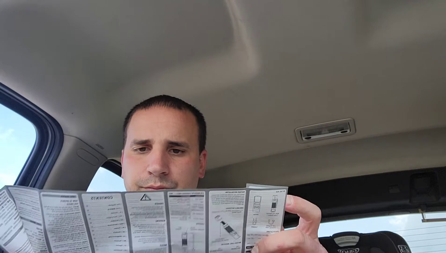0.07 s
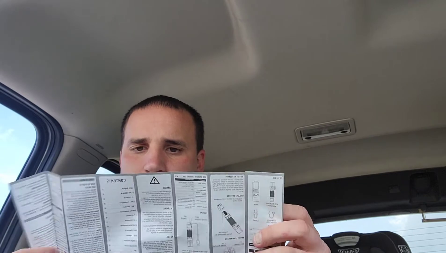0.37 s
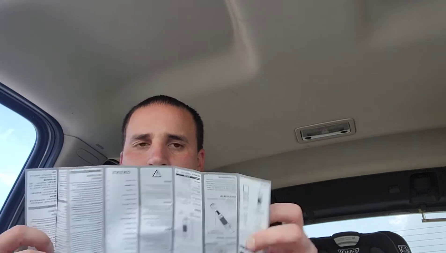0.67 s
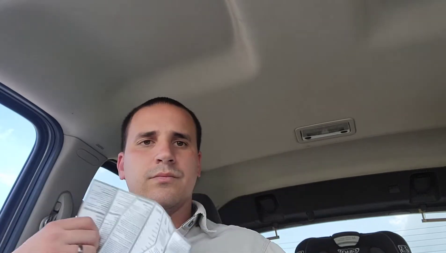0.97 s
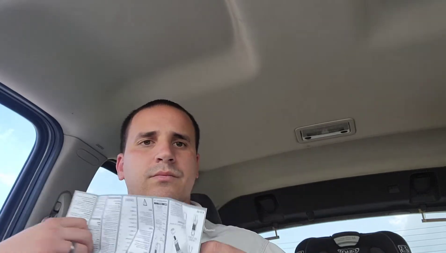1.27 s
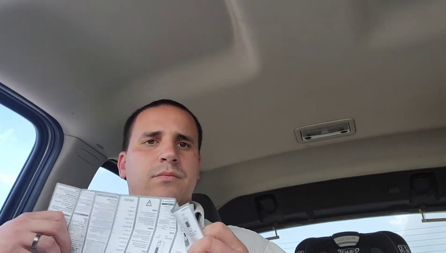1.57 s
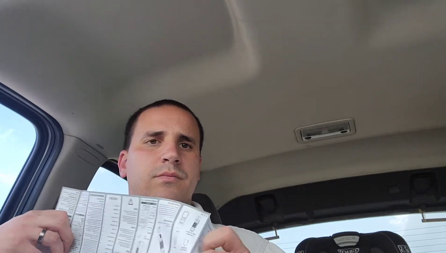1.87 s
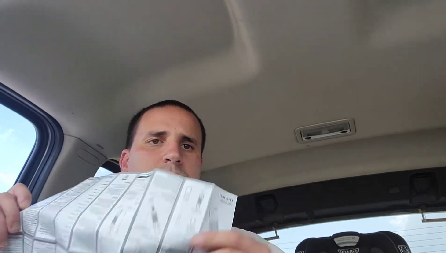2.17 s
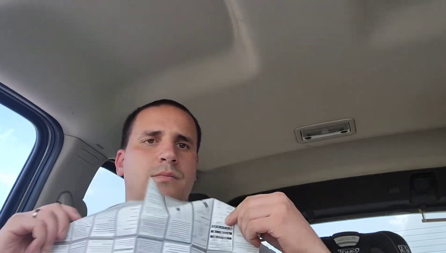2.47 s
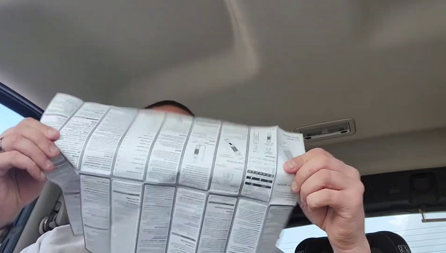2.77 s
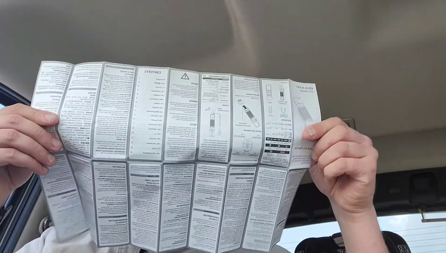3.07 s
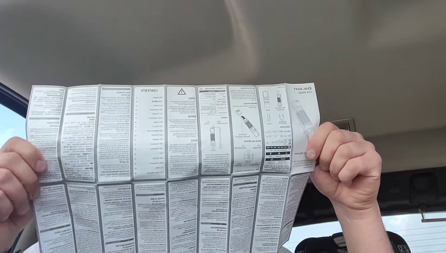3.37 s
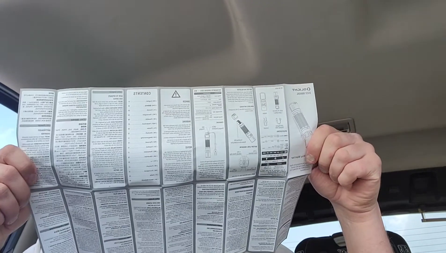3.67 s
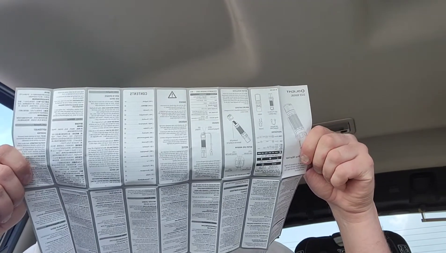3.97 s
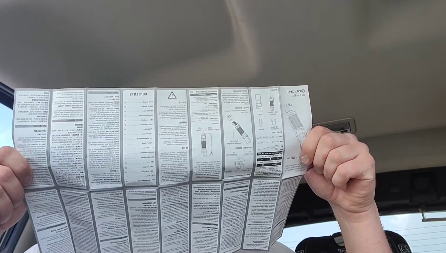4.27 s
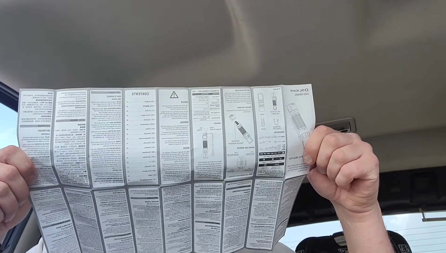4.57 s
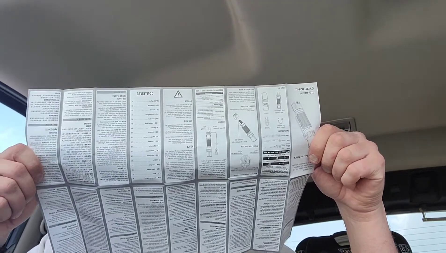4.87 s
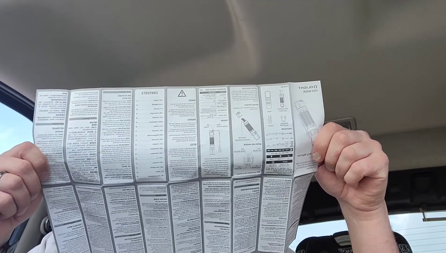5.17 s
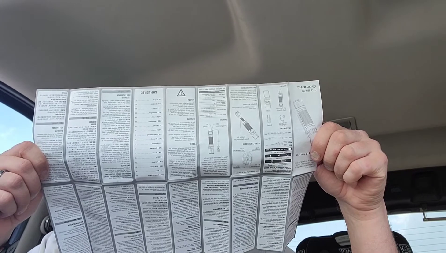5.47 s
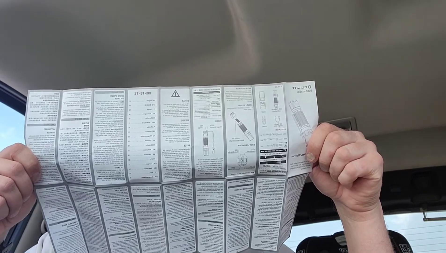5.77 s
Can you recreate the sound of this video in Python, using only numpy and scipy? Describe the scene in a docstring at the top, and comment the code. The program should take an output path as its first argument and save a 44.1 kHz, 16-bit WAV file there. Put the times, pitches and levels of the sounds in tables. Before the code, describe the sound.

A steady low hum and rumble from an idling engine fills a vehicle cabin for all six seconds. Close to the microphone, a folded paper leaflet is opened. It begins with light crackles and faint fingertip rubbing in the first half second. From about 0.8 to 2.3 seconds the creases snap in quick, irregular clusters over the rustle of sliding panels, with a sharp snap near 2 seconds. At about 2.7 seconds the sheet flaps open with the loudest crackle and a short, soft thud. Lighter ticks follow and die away by about 3.8 seconds as the paper is held still. The snaps sound tight and close in the small space. From around 4 seconds a faint drone climbs slowly in pitch over the hum, and a barely audible thin whine enters near 4.5 seconds. The hum carries on to the end.

```python
"""Paper snaps and rustles: a folded leaflet is opened near a phone in the cabin of an idling vehicle.
Creases buckle in short runs, panels slide, fingertips rub, the sheet flaps open once.
Glass and trim reflect the paper at short delay. Then the sheet is held still over the engine hum;
a faint drone rises in pitch and a thin whine comes in."""
import sys
import numpy as np
from scipy import signal
from scipy.fft import rfft, irfft
from scipy.io import wavfile
from scipy.ndimage import uniform_filter1d

SR = 44100
rng = np.random.default_rng(int(sys.argv[2]) if len(sys.argv) > 2 else 0)


def wav_record(signal):
    """Record a signal, one row per channel, as 16-bit PCM in the file named by sys.argv[1]."""
    frames = np.transpose(np.atleast_2d(signal))
    bounded = np.clip(frames, -1, 1)
    # unit amplitude maps onto the largest positive 16-bit level
    quanta = np.round(bounded * 32767).astype(np.int16)
    wavfile.write(sys.argv[1], SR, quanta)


N = 264688
TIME_S = np.arange(N) / SR

# buckling creases: (time [s], run length [ms], relative level [dB], bass [dB], treble [dB],
# panel ring [Hz], ring boost [dB])
CREASE_SNAPS = [(0.083, 18.2, -34.5, -1, -11, 1810, -2), (0.198, 2.03, -36.5, -14, 3.5, 4300, 4.5),
                (0.28, 3.06, -44, 12, -45, 2830, 10), (0.353, 4.5, -35.5, -0.5, -5, 5030, 7.5),
                (0.42, 3.4, -39.5, -4, -11, 1700, 4), (0.445, 2.28, -29.5, -10.5, -5, 2040, -0.5),
                (0.826, 4.7, -43, 17.5, -26, 2970, 10), (0.85, 5.8, -32.5, 1, -3, 3620, 7),
                (0.874, 9, -35, -8, -1, 2340, 7), (1.0234, 4.2, -28.5, -12, 6, 1800, 10.5),
                (1.078, 8, -33.5, 0, -40, 1980, 16.5), (1.113, 5.1, -46.5, 15.5, -30, 1443, 7),
                (1.155, 11.5, -37, 2, -2.5, 1920, 3.5), (1.2323, 2.93, -26, 0.5, 2, 4600, 11.5),
                (1.2778, 4.03, -29.5, 0, -.5, 4830, 0), (1.343, 5.7, -31, -2.5, -2, 4800, 5),
                (1.399, 8.3, -28.5, -6, 2, 1630, 17), (1.407, 2.2, -27.5, 0, 4.5, 3100, -9),
                (1.419, 9, -26, 0, -4, 5530, 3), (1.472, 6, -43, 6, -38, 2500, 9),
                (1.668, 3.8, -32, 8, -5, 2000, 6), (1.6793, 5, -23.5, 2, 6, 2050, 12.5),
                (1.73, 3.5, -34.5, -14, -5, 3300, -1), (1.759, 9.2, -39, 8, -2, 1890, 8),
                (1.826, 3.7, -36.5, 1, -20, 1770, 15), (1.938, 5.5, -35, 1.5, -4, 2400, 6),
                (1.963, 8.8, -40, 5, -18.5, 3373, 5.5), (2.0062, 2.95, -24, -4.5, 5, 1900, 8),
                (2.0438, 1.84, -20, 1, 9.5, 3700, 3), (2.0482, 5.6, -18.5, -2, -1, 3800, 5),
                (2.083, 5.6, -37, 10.5, -19, 1280, 5), (2.135, 4, -40.5, 6.5, -45, 1300, 11.5),
                (2.248, 7.6, -33.5, -3.5, -11, 5150, 2), (2.277, 6.3, -31, 1.5, -15, 3100, 5),
                (2.2914, 5.2, -22, -5.5, 5, 3170, 2), (2.3257, 2.5, -34, -4, -14, 3030, 4.5),
                (2.5309, 2.3, -30.5, -9, -1.5, 3850, 1), (2.578, 12.8, -37.5, 8, -13, 3700, 3),
                (2.623, 19, -29, 7, -8, 2600, .5), (2.645, 12.7, -26, 5, -7, 2640, 6.5),
                (2.6567, 2.28, -18.5, 3, 1, 3477, 3.5), (2.661, 4.74, -13.5, -8.5, 3, 3564, 1),
                (2.672, 14.5, -23, -1.5, -7, 3305, 4), (2.686, 6.7, -26, 2.5, -2.5, 1510, 6),
                (2.7557, 4, -34, 7.5, -8, 3830, 3.5), (2.782, 5.4, -35, 9.5, -19, 1510, 5),
                (2.793, 8, -33, 5, -5.5, 1280, 9), (2.839, 6.3, -45, 11, -17, 2720, 5),
                (3.115, 3.2, -40.5, -4, -34, 3570, 10), (3.1844, 4.2, -36.5, -1, 0, 2300, 8),
                (3.2386, 4.9, -40.5, 14, -47, 1500, 3), (3.431, 4.9, -61.5, 23.5, -37, 805, 10.5),
                (3.5091, 1.9, -33.5, 0, -2, 4300, 8), (3.673, 2.02, -56.5, 15, -10, 2210, 8.5),
                (3.744, 2.3, -57.5, 1, -4, 1900, 3), (4.232, 2, -63.5, 4.5, -3.5, 2000, 3),
                (5.065, 2, -68, 6, 1, 1300, 1.5)]
# radiation spectrum of the sheet: (frequency [Hz], gain [dB])
PAPER_SPECTRUM = [(130, -27.5), (220, -12), (310, -3), (440, -7), (580, 2), (820, -5.5), (1300, -5),
                  (2100, 0), (2700, 0.5), (3600, 0), (6800, -2), (10000, -11.5), (12300, -4.5),
                  (15200, -11)]
# panel sliding on panel: (start [s], length [s], relative level [dB], bass [dB], treble [dB])
PANEL_SLIDES = [(0.076, 0.059, -45.5, -7, 0.5), (0.227, 0.012, -45.5, -4, 0), (0.386, 0.16, -54.5, 2, -5),
                (0.628, 0.012, -57, -1, 10), (0.73, 0.17, -53.5, 12, -5.5), (0.854, .17, -40, 5, -4),
                (0.94, 0.024, -43.5, 8, 7), (1.044, 0.12, -46, 5, -2), (1.18, 0.25, -55, 10, 0),
                (1.376, 0.063, -42, 9.5, -8), (1.49, 0.037, -55.5, 8, 4.5), (1.588, 0.016, -42, 5.5, 0.5),
                (1.642, 0.14, -56, 18.5, 2), (1.83, .14, -47, 7, -2.5), (2.051, .04, -51, 14, -2),
                (2.161, 0.029, -48, 9, -0.5), (2.236, 0.057, -50, 10, -1), (2.447, .045, -57, 16.5, 0.5),
                (2.527, 0.073, -50.5, 8.5, 1.5), (2.679, 0.023, -35.5, 5, -19), (2.735, .075, -51, 13, -1),
                (3.046, 0.4, -64, 11, -0.5), (3.19, 0.04, -57.5, 1, 2)]
# air pushed by the opening sheet: (time [s], frequency [Hz], relative level [dB], decay [s])
FLAP_PARTIALS = [(2.658, 172, -31, 0.021), (2.656, 320, -19.5, 0.0076), (2.657, 390, -24.5, 0.011)]
# fingertips along the edge: (start [s], length [s], relative level [dB])
FINGER_RUBS = [(0.012, 0.17, -59.5), (0.38, 0.26, -62.5)]
# engine and belt drive tones: (frequency [Hz], level [dB])
ENGINE_TONES = [(122.2, -58.5), (293, -62.5), (341, -79.5), (366, -83), (390, -74.5), (439, -78.5)]
# rising drone: (time [s], pitch [Hz], level [dB])
DRONE_TRACK = [(3.7, 225.7, -75), (4.1, 242.3, -61), (4.35, 262, -61), (4.65, 275.8, -53.5),
               (5.0, 288.8, -60.5), (5.4, 296.3, -64.5), (6.0, 303.6, -60.5)]
# late whine: (frequency [Hz], level [dB])
WHINE_PARTIALS = [(1308, -85.5), (1976, -85.5), (2234, -97), (3268, -88), (3924, -93), (4554, -100)]
# treble whistles: (frequency [Hz], level [dB])
WHISTLE_TONES = [(6650, -93), (10000, -91.5), (13300, -93.5)]
# cabin rumble and hiss: (frequency [Hz], gain [dB])
CABIN_SPECTRUM = [(20, -23), (35, -14), (65, 4), (110, -4), (145, -15.5), (300, -16.5), (470, -27),
                  (700, -35), (2000, -44), (5200, -55.5), (7800, -54), (10400, -73), (12800, -59),
                  (15500, -64.5)]
# standing waves between glass and trim: (frequency [Hz], width [Hz], boost [dB])
STANDING_WAVES = [(1140, 71, 6), (1340, 89.6, 0), (1460, 27, 2), (1960, 130, 5), (2300, 147.3, 5),
                  (3428, 240, 3), (3882, 200, 4), (4590, 480, 1.5)]


def snaps(gain_db=26.0, strong_db=-24.5):
    """All creases buckling: dull ones on the sheet's loose left side, strong ones further right."""
    out = np.zeros((2, N + SR))
    for time_s, run_ms, db, bass_db, treble_db, ring_hz, ring_db in CREASE_SNAPS:
        sound, lead = buckle(run_ms, bass_db, treble_db, ring_hz, ring_db)
        left_db = 1.8 - 0.0449 * treble_db - 0.35 * max(db - strong_db, 0)
        start = int(time_s * SR) - lead
        out[:, start:start + sound.shape[1]] += sound * undb(gain_db + db) * pan(left_db)
    return out[:, :N]


def buckle(run_ms, bass_db, treble_db, ring_hz, ring_db, ring_oct=0.3, strain_db=-14, strain_s=0.0043):
    """One crease yields: fibres slip under rising strain, a snap sets off more, the panel rings."""
    size, lead, followers = 8192, 512, 6
    f = bins_hz(size)
    delays_s = np.r_[0, rng.uniform(0, run_ms / 1000, followers)] + lead / SR
    strengths = np.r_[1, 0.55 * rng.laplace(size=followers) / np.sqrt(2)]
    slips = rng.standard_normal(lead) * np.exp((np.arange(lead) - lead) / SR / strain_s)
    strain = undb(strain_db) * np.linalg.norm(strengths) * slips / np.linalg.norm(slips)
    run = strengths @ np.exp(-2j * np.pi * np.outer(delays_s, f)) + rfft(strain, size)
    panel_db = ring_db * np.exp(-(np.log2((f + 1) / ring_hz) / ring_oct) ** 2)
    gain = gain_at(PAPER_SPECTRUM, f) * cabin_gain(f) * undb(panel_db + tilt_db(f, bass_db, treble_db))
    spectrum = rfft(cabin_paths()) * run * minimum_phase(gain)
    midband = (f > 1500) & (f < 6500)
    midband_rms = np.sqrt(np.mean(abs(spectrum) ** 2 * midband, axis=1, keepdims=True))
    return irfft(spectrum / midband_rms), lead


def rustle(rub_db=-9, patchy_db=3.5, taut_s=3.85, fade_s=0.055):
    """Fibre slips over a rubbing hiss; dies away once the sheet is taut."""
    level_db, bass_db, treble_db = handling()
    friction = fibre_slips() + undb(rub_db) * rng.standard_normal((2, N))
    f, t, frames = signal.stft(unit(colour(friction, PAPER_SPECTRUM)), SR, nperseg=512)
    tone_db = tilt_db(f, np.interp(t, TIME_S, bass_db), np.interp(t, TIME_S, treble_db))
    # panel resonances shift as the sheet bends
    patches = uniform_filter1d(rng.standard_normal(tone_db.shape), size=3, axis=0)
    patches = unit(uniform_filter1d(patches, size=8, axis=1))
    frames = frames * cabin_gain(f)[:, None] * undb(tone_db + patchy_db * patches)
    sound = signal.istft(frames, SR)[1][:, :N]
    fade = np.exp(-np.maximum(TIME_S - taut_s, 0) / fade_s)
    return sound * fade * undb(level_db) * pan(left_db=2)


def handling(stir_db=-60, stir_bass_db=7, stir_treble_db=0.5, settle_at_s=1.9, settle_db_per_s=8):
    """Jerky slides over the hands' waning stir of the sheet: (level [dB], bass [dB], treble [dB])."""
    power = undb(stir_db - settle_db_per_s * np.maximum(TIME_S - settle_at_s, 0)) ** 2
    bass, treble = power * stir_bass_db, power * stir_treble_db
    for start_s, length_s, level_db, bass_db, treble_db in PANEL_SLIDES:
        slide = (undb(level_db) * stroke(start_s, length_s)) ** 2
        power += slide
        bass += slide * bass_db
        treble += slide * treble_db
    jerk_db = 1.5 * walk(70)
    return 10 * np.log10(power) + jerk_db, bass / power, treble / power


def fibre_slips(rate_hz=600, spread_db=3.0, spots=4):
    """Dense tiny clicks from several spots on the sheet, each wavering in level."""
    out = 0
    for _ in range(spots):
        strengths = rng.choice([-1, 1], N) * undb(spread_db * np.minimum(rng.exponential(size=N), 5))
        clicks = (rng.random(N) < rate_hz / spots / SR) * strengths * undb(2.5 * walk(14))
        out = out + signal.oaconvolve(clicks[None], cabin_paths(), axes=1)[:, :N]
    return unit(out)


def tilt_db(f, bass_db, treble_db):
    """Wide panels add body below 2.3 kHz; tight creases add treble."""
    body = np.interp(f, [250, 550, 900, 1300, 2300], [.3, .88, .88, .62, 0])
    top = np.interp(f, [3800, 10000], [0, 1])
    return np.multiply.outer(body, bass_db) + np.multiply.outer(top, treble_db)


def flap(rise_s=0.0073):
    """The whole sheet flaps open and pushes air: a short, soft thud."""
    out = np.zeros(N)
    for time_s, hz, db, decay_s in FLAP_PARTIALS:
        age_s = np.maximum(TIME_S - time_s, 0)
        envelope = np.exp(-age_s / decay_s) * (1 - np.exp(-age_s / rise_s))
        out += undb(db) * envelope * np.sin(2 * np.pi * hz * age_s)
    return out


def fingers(rough_db=6.0):
    """Dry skin on paper: narrow, uneven hiss."""
    band = [(2000, -36), (3600, 0), (4350, 5), (5100, -23), (8000, -39)]
    hiss = unit(colour(rng.standard_normal((2, N)), band))
    rubs = sum(undb(db) * stroke(start_s, length_s) for start_s, length_s, db in FINGER_RUBS)
    return hiss * undb(rough_db * walk(60)) * rubs


def stroke(start_s, length_s, attack_s=0.014, release_s=0.031):
    """Envelope of one hand movement: build, hold, decay."""
    before_s = np.maximum(start_s - TIME_S, 0)
    after_s = np.maximum(TIME_S - start_s - length_s, 0)
    return np.exp(-before_s / attack_s - after_s / release_s)


def cabin_paths(crack_s=0.0006, early_s=0.0079, late_s=0.017, direct_db=-4, late_db=-13, size=8192):
    """Sheet to both microphone ports: direct crack, dense near reflections, short dull tail."""
    t = np.arange(size) / SR
    crack = rng.standard_normal(size) * np.exp(-t / crack_s)
    direct = np.array([np.roll(crack, lag) for lag in rng.integers(0, 16, 2)])
    reflections = rng.standard_normal((2, size)) * rng.exponential(size=(2, size))
    early = reflections * np.exp(-t / early_s) * (1 - np.exp(-t / .00035))
    dull_noise = signal.lfilter(*signal.butter(1, 4500, fs=SR), rng.standard_normal((2, size)))
    late = dull_noise * np.exp(-t / late_s)
    return undb(direct_db) * unit(direct) + unit(early) + undb(late_db) * unit(late)


def cabin_gain(f):
    """Resonant peaks of the cabin's standing waves."""
    peaks_db = sum(db / (1 + (2 * (f - hz) / width_hz) ** 2) for hz, width_hz, db in STANDING_WAVES)
    return undb(peaks_db - 0.5)


def close_ports(x):
    """Long waves reach both microphone ports alike: stereo narrows in the bass."""
    mid = colour((x[0] + x[1]) / 2, [(250, 2.0), (500, 1.2), (900, 0.42)])
    side = colour((x[0] - x[1]) / 2, [(250, -9.5), (500, -5.5), (900, 1.0)])
    return np.array([mid + side, mid - side])


def engine(firing_hz=40.7, hunt_hz=0.12, boom_db=-42.5, throb_db=1.15, waver_db=2):
    """Idle: the firing rate hunts and booms through the cabin; weaker tones waver above."""
    hz = firing_hz + hunt_hz * walk(4.7)
    boom = np.sqrt(2) * undb(boom_db + throb_db * walk(6)) * np.sin(2 * np.pi * np.cumsum(hz) / SR)
    return boom + sum(tone(f, db + waver_db * walk(4.4), wander_rad=0.7, wander_hz=5)
                      for f, db in ENGINE_TONES)


def drone(width_hz=24):
    """Rough hum: a narrow noise band that climbs and levels off."""
    times_s, pitches_hz, levels_db = np.transpose(DRONE_TRACK)
    phase = 2 * np.pi * np.cumsum(np.interp(TIME_S, times_s, pitches_hz)) / SR
    gain = undb(np.interp(TIME_S, times_s, levels_db))
    return gain * (walk(width_hz) * np.sin(phase) + walk(width_hz) * np.cos(phase))


def whine(start_s=4.5, rise_s=0.28, hiss_db=-83):
    """Thin, unsteady partials and slight hiss, fading in."""
    fade = np.clip((TIME_S - start_s) / rise_s, 0, 1)
    partials = sum(tone(hz, db, wander_rad=1.0, wander_hz=50) for hz, db in WHINE_PARTIALS)
    hiss = unit(colour(rng.standard_normal((2, N)), [(1500, -30), (2900, 3), (4600, -5), (6000, -27)]))
    return fade * (partials + undb(hiss_db) * hiss)


def whistles():
    """Very faint, slightly unsteady high tones."""
    return sum(tone(hz, db, wander_rad=1.2, wander_hz=120) for hz, db in WHISTLE_TONES)


def cabin_noise(level_db=-45.0, swell_db=0.48):
    """Near-mono, slowly swelling rumble and wide hiss, coloured by the standing waves."""
    resonant = irfft(rfft(rng.standard_normal((2, N))) * cabin_gain(bins_hz(N)), N)
    mid, side = colour(resonant, CABIN_SPECTRUM)
    side = colour(side, [(80, -10.5), (200, -6), (400, -6.5), (700, 0.5)])
    noise = np.array([mid + side, mid - side]) / np.std(mid)
    rumble = colour(noise, [(130, -0.5), (250, -12), (600, -39)])
    hiss = noise - rumble
    return (rumble * undb(swell_db * walk(1.5)) + hiss) * undb(level_db)


def tone(hz, rms_db, wander_rad, wander_hz):
    """Sine with random phase wander."""
    return np.sqrt(2) * undb(rms_db) * np.sin(2 * np.pi * hz * TIME_S + wander_rad * walk(wander_hz))


def walk(rate_hz):
    """Random steps at rate_hz, smoothed twice; rms 1."""
    hold = int(SR / rate_hz)
    steps = np.repeat(rng.standard_normal(N // hold + 2), hold)
    return unit(uniform_filter1d(uniform_filter1d(steps, hold), hold)[:N])


def minimum_phase(gain):
    """Response with this gain that rings only after the impulse."""
    cepstrum = irfft(np.log(gain + 1e-9))
    half = len(cepstrum) // 2
    cepstrum[1:half] *= 2
    cepstrum[half + 1:] = 0
    return np.exp(rfft(cepstrum))


def colour(x, points):
    """Filter x by a curve of (frequency [Hz], gain [dB])."""
    size = x.shape[-1]
    return irfft(rfft(x) * gain_at(points, bins_hz(size)), size)


def gain_at(points, f):
    """Linear gain at f of a curve of (frequency [Hz], gain [dB])."""
    hz, db = np.transpose(points)
    return undb(np.interp(np.log(f + 1), np.log(hz), db))


def bins_hz(size):
    return np.arange(size // 2 + 1) * SR / size


def pan(left_db):
    """Stereo gains, left above right by left_db."""
    return undb([[left_db / 2], [-left_db / 2]])


def undb(db):
    return 10 ** (np.asarray(db) / 20)


def unit(x):
    """Scale to rms 1."""
    return x / np.sqrt(np.mean(x ** 2))


def scene():
    """Leaflet over the cabin background."""
    leaflet = close_ports(snaps() + rustle() + fingers()) + flap()
    background = engine() + drone() + whistles() + cabin_noise() + whine()
    return leaflet + background * pan(left_db=-0.7)


def record(dry):
    """Phone: soft peak limit, 15.4 kHz low-pass."""
    limited = dry / (1 + (dry / .85) ** 4) ** .25
    return signal.sosfilt(signal.ellip(8, .2, 70, 15400, fs=SR, output="sos"), limited)


dry = scene()
out = record(dry)
wav_record(out)
```